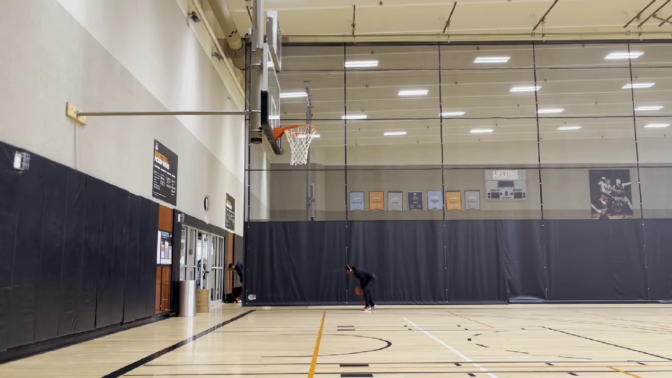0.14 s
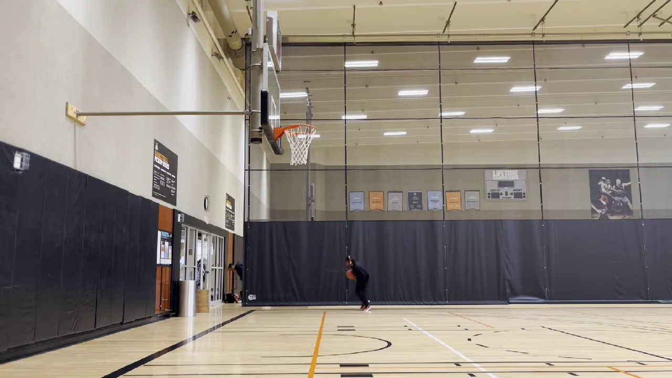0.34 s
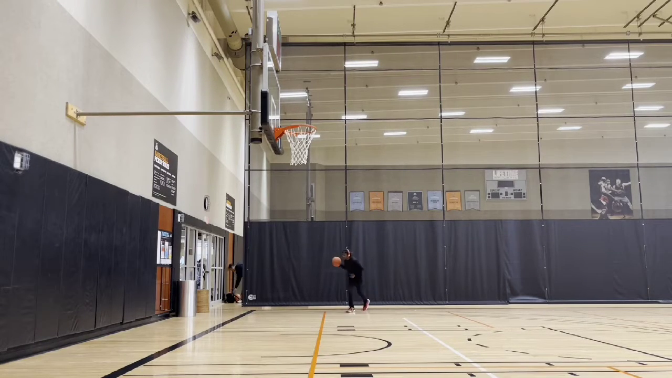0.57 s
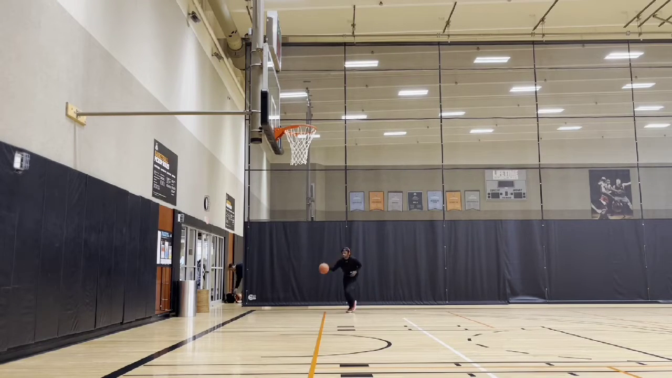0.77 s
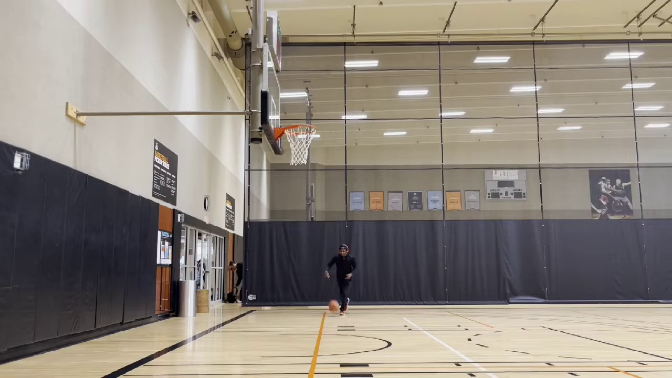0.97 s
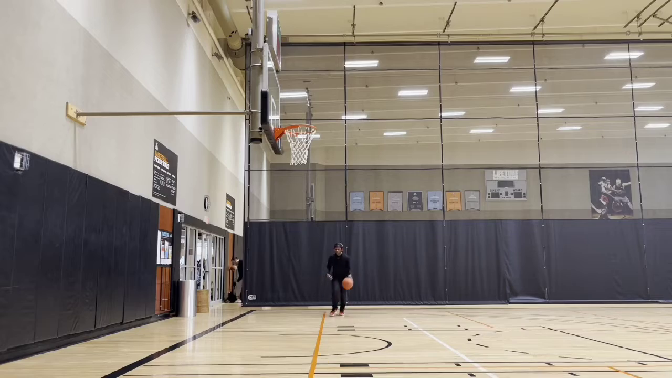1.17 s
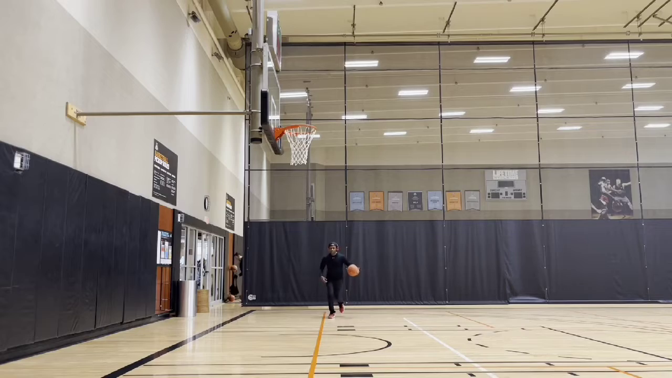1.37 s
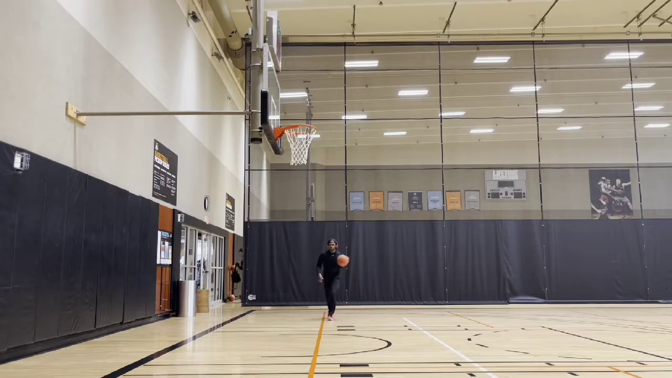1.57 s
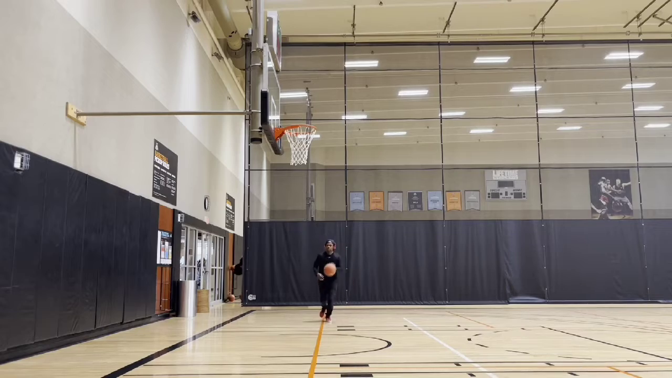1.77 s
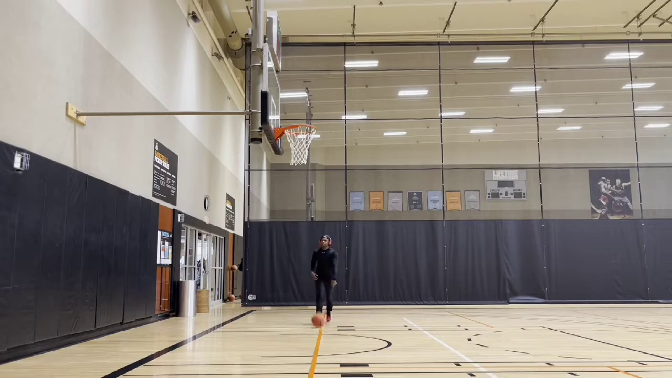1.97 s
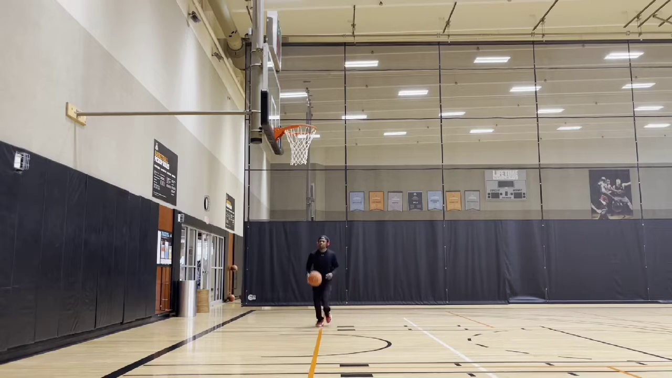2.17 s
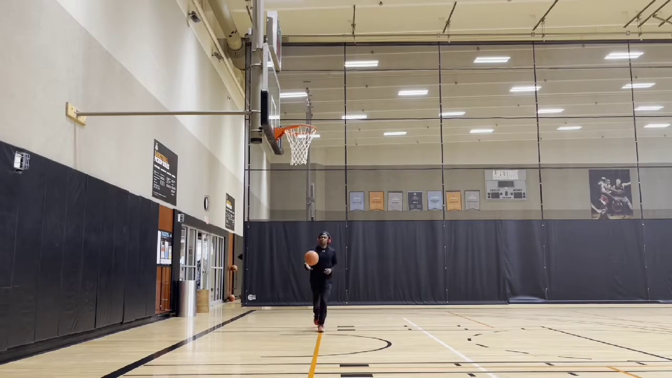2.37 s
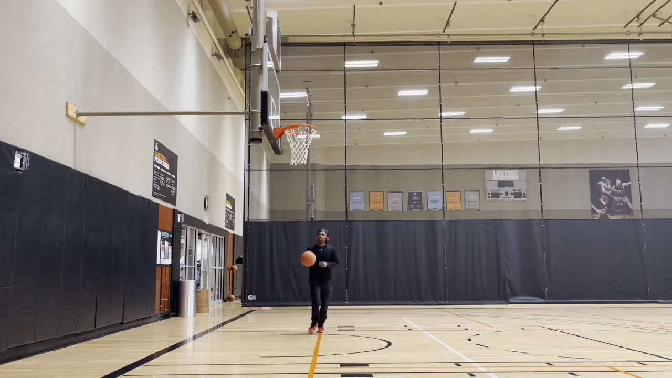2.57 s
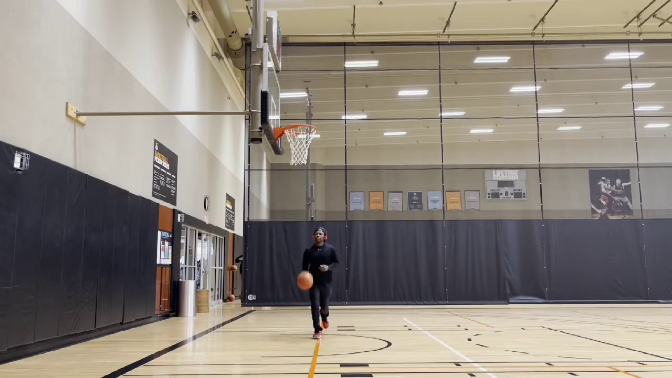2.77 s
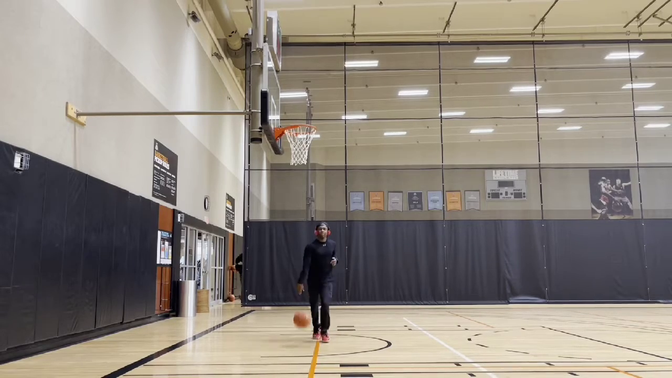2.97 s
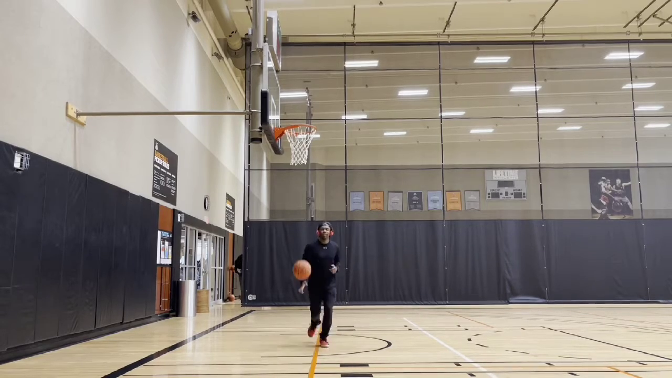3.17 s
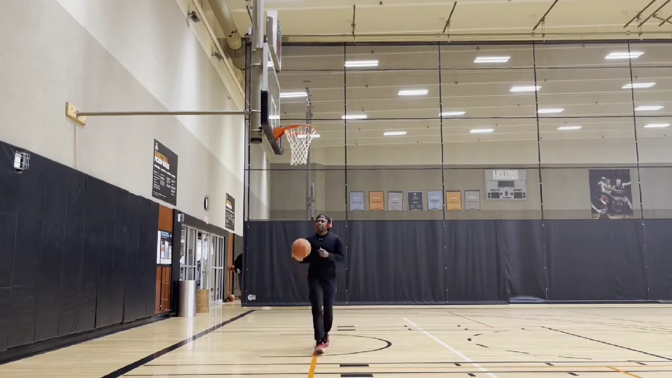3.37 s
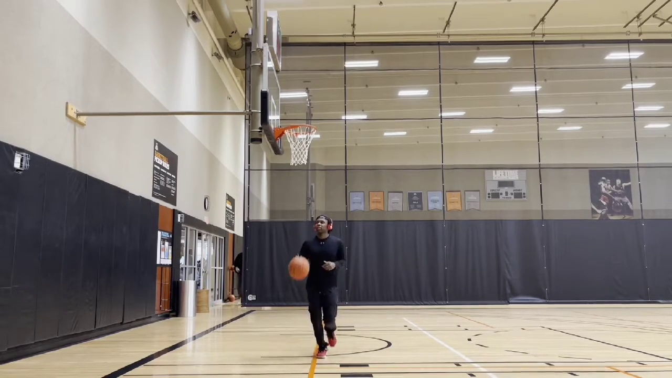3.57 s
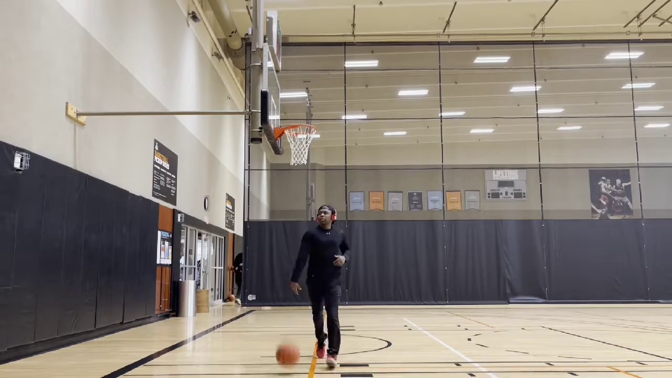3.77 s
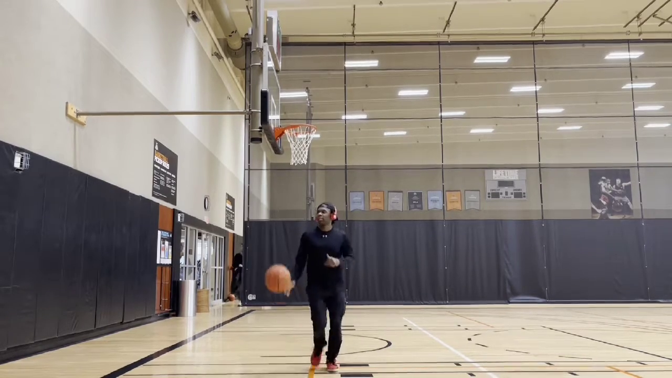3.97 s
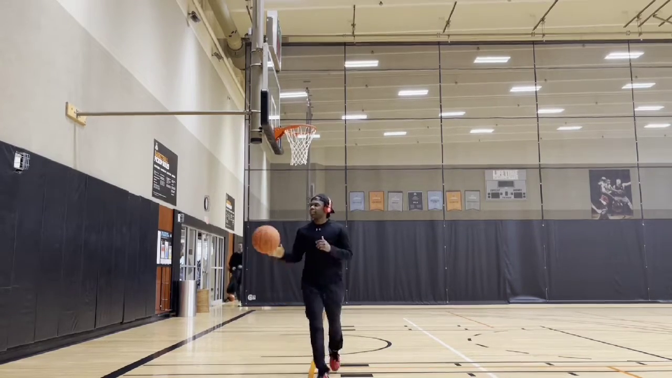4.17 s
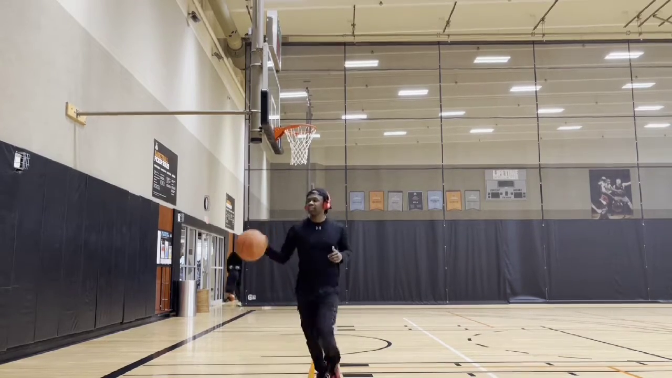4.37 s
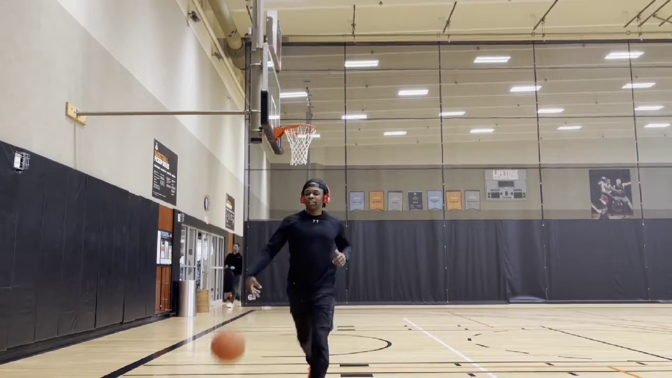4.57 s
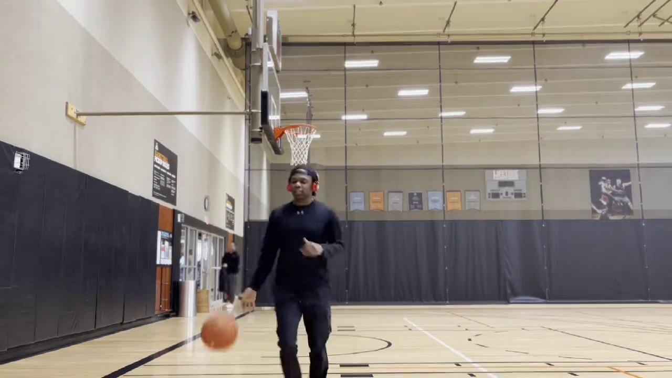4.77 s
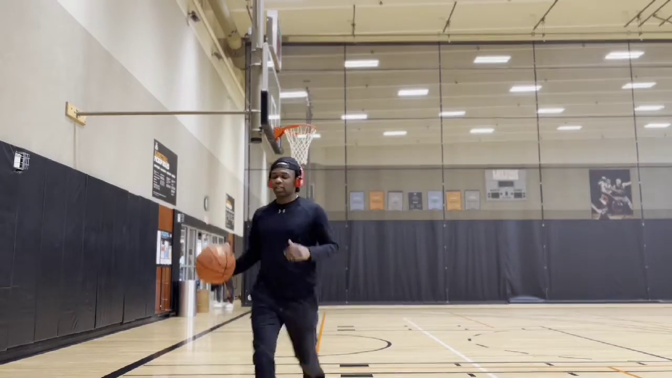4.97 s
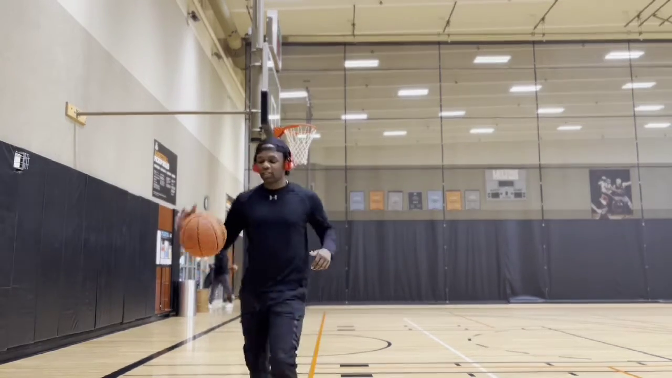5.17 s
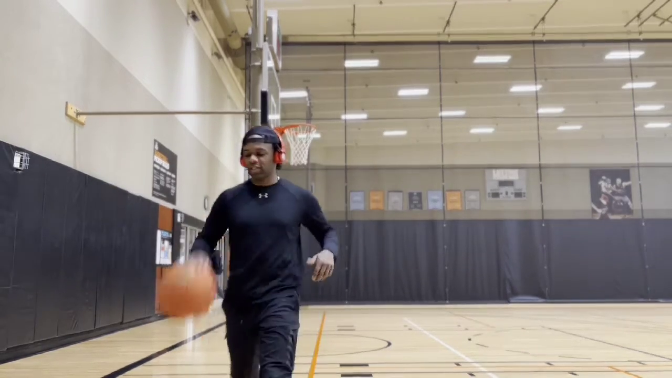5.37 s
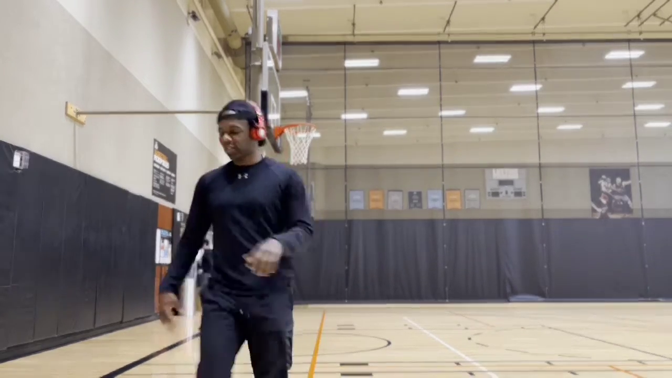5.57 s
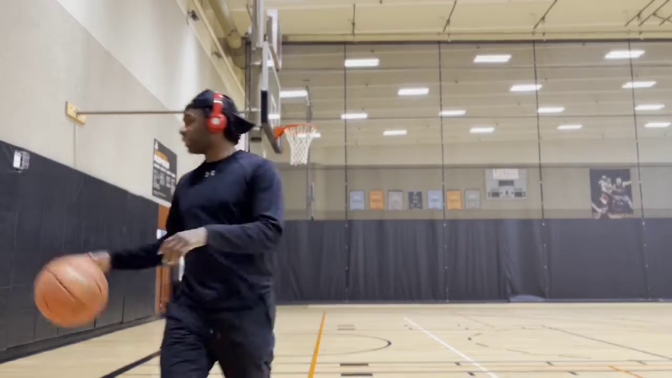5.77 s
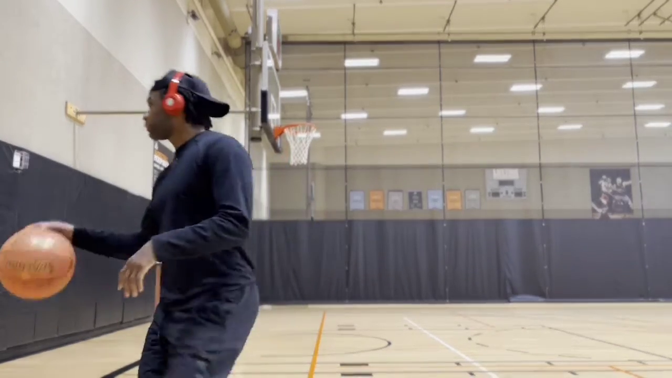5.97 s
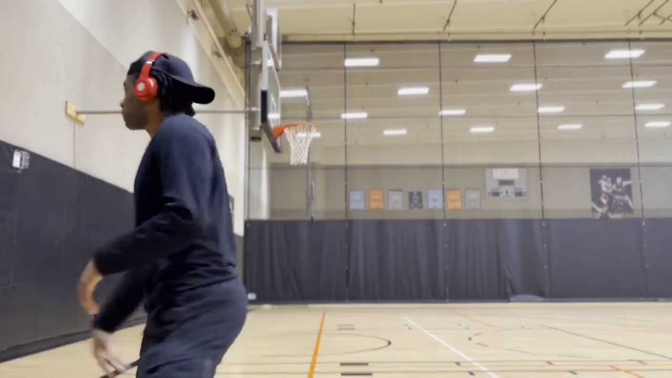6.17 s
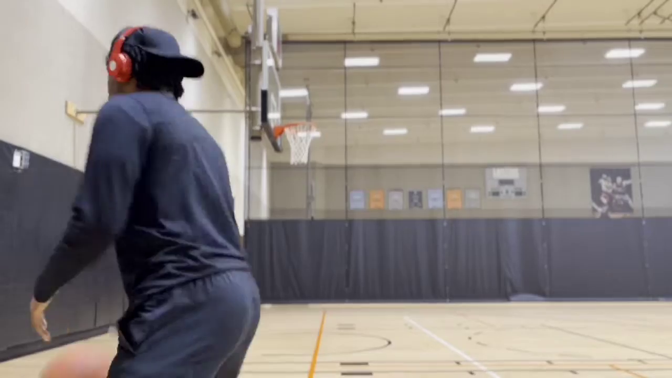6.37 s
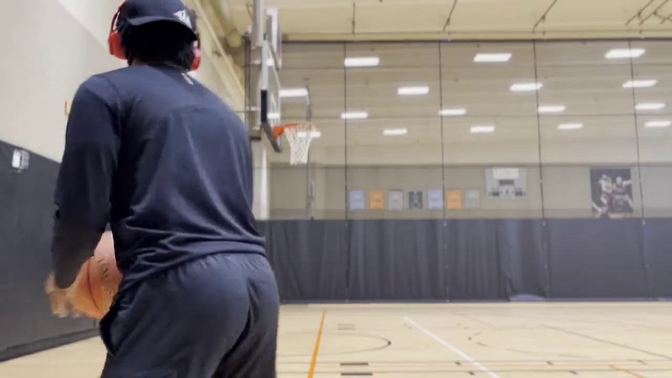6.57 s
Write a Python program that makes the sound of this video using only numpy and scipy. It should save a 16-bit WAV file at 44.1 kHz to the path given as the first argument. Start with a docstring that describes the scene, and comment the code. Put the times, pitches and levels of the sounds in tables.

```python
"""Basketball bounces ring through a large gym as a player dribbles toward the microphone.
Each bounce is a slap of the skin, a ping of the air in the ball and a falling boom of the sprung
hardwood floor; two walls echo it and the hall rings long after. Soles grip, trousers swish, and
the hand brushes the ball and once catches it with a sharp slap, over the rumble of the ventilation."""
import sys
import numpy as np
from scipy import signal
from scipy.fft import rfft, irfft, next_fast_len
from scipy.io import wavfile
from scipy.ndimage import uniform_filter1d

SR = 44100
rng = np.random.default_rng(int(sys.argv[2]) if len(sys.argv) > 2 else 0)


def int16_out(signal):
    """Quantize to a 16-bit WAV file."""
    q = np.round(np.clip(np.atleast_2d(signal).T, -1, 1) * 32767)
    wavfile.write(sys.argv[1], SR, q.astype(np.int16))


N = 292463

# Each bounce hits another spot of the floor:
# start_s, force_db, boom_db, settled_boom_hz, board_resonance_hz, board_peak_db, catch_rub_db
BOUNCE_EVENTS = [(1.1259, -0.14, -20.5, 126.5, 1430, 15, -82), (2.089, 2.5, -14.5, 141, 1460, 11, -91),
                 (3.0339, 4.5, -13, 119, 1176, 10, -77), (3.8649, 3, -11, 116.4, 1380, 8.5, -87),
                 (4.7474, 2.5, -11.5, 93.5, 1510, 5.5, -63), (5.6313, -0.8, -10.5, 101, 1320, 8.5, -66.5),
                 (6.3229, 0, -11.5, 97.6, 1670, 10.5, -83)]


def dribble(side_wall_m=8.2, side_wall_db=-26.5, back_wall_s=0.05, back_wall_db=-13.5):
    """Bounces, echoes and reverberation; as the player nears, the slap brightens, the side echo lags."""
    out, t, hz = np.zeros(N), np.arange(SR // 3) / SR, np.fft.rfftfreq(4096, 1 / SR)
    sound_m_per_s = 343
    for start_s, force_db, boom_db, boom_hz, board_hz, board_db, _ in BOUNCE_EVENTS:
        range_m = distance_m(start_s)
        tilt_db_per_octave = 3.5 - 0.24 * range_m
        colour_db = read(SLAP_SPECTRUM, hz) + tilt_db_per_octave * np.log2((hz + 200) / 1500)
        colour_db += board_db * bell(hz, board_hz, 0.16)
        smack = slap(t, colour_db) + ping(t)
        smack_db = force_db - 16 - 0.8 * np.log2(range_m)
        thud = boom(t, boom_hz)
        side_wall_s = (np.hypot(range_m, 2 * side_wall_m) - range_m) / sound_m_per_s
        bass_db = 3.5 - force_db  # the floor feeds the hall the same bass however hard the slap
        add(out, start_s, amp(boom_db) * thud + amp(smack_db) * smack)
        add(out, start_s + side_wall_s, amp(force_db + side_wall_db) * side_wall(t, smack, thud))
        add(out, start_s + back_wall_s, amp(boom_db + back_wall_db) * back_wall(t, thud))
        add(out, start_s, amp(force_db) * hall(boom_hz, board_hz, board_db, bass_db))
    return out


# Skin on the boards: frequency_hz, density_db
SLAP_SPECTRUM = [(100, -2.5), (300, 2.5), (520, 5), (660, -6.5), (800, -6), (1100, -5), (1600, -9.5),
                 (2000, -13.5), (3200, -15), (4800, -16.5), (6300, -29.5), (10000, -33), (15500, -46)]
# Skin snaps at first touch, as its ripple comes round, and at lift-off: delay_s, level_db, t60_s
SKIN_SNAPS = [(0, -2.5, 0.021), (.0062, -8, 0.02), (0.0104, -15, .012), (0.0151, -16, 0.055)]


def slap(t, colour_db, level_db=-2.5, rattle_db=-21, rattle_t60_s=0.085, spike_db=20.5):
    """The skin snaps as the ball flattens and lifts; the boards shiver on."""
    force = grit(len(t), grain_db=4) * amp(rattle_db - 60 * t / rattle_t60_s)
    for delay_s, snap_db, t60_s in SKIN_SNAPS:
        snap = rng.standard_normal(len(t)) * amp(-60 * t / t60_s)
        snap[0] = -amp(spike_db)
        add(force, delay_s * rng.uniform(0.93, 1.07), amp(snap_db) * snap)
    return amp(level_db) * signal.fftconvolve(force, causal(colour_db))[:len(t)]


# Air modes in the ball: pitch_hz, level_db, t60_s
BALL_MODES = [(910, -26, 0.099), (1625, -6.5, 0.027), (2280, -13, 0.014), (2600, -28, 0.078),
              (3380, -37, 0.018), (4000, -34.5, 0.16), (4600, -41, 0.097), (5340, -39, .1)]


def ping(t, level_db=-1, uneven_db=2):
    """The air in the ball rings; each blow excites its modes differently."""
    out = np.zeros(len(t))
    for pitch_hz, mode_db, t60_s in BALL_MODES:
        struck_db = level_db + mode_db + uneven_db * rng.standard_normal()
        out += amp(struck_db - 60 * t / t60_s) * np.sin(2 * np.pi * (pitch_hz * t + rng.random()))
    return out


# Short resonances of the boards: pitch_hz, level_db, peak_s, sharpness
BOARD_MODES = [(263, -0.5, 0.0067, 4.85), (515, -27, 0.0074, 0.51), (635, -21.5, 0.0095, 3.8)]


def boom(t, settled_hz, start_hz=176, sag_s=0.008):
    """Bending waves in the floor: high ones arrive first, so the pitch sags; the boards knock above."""
    sagging_hz = settled_hz + (start_hz - settled_hz) * np.exp(-t / sag_s)
    bending = swell(t, peak_s=0.015, sharpness=3.05) * np.sin(2 * np.pi * np.cumsum(sagging_hz) / SR)
    knock = sum(amp(level_db) * swell(t, peak_s, sharpness) * np.sin(2 * np.pi * pitch_hz * t)
                for pitch_hz, level_db, peak_s, sharpness in BOARD_MODES)
    return bending + knock


def side_wall(t, smack, thud, spread_s=0.0077, band_hz=(380, 1900)):
    """The wall along the player's path scatters the bounce, short of bass and treble."""
    echo = scatter(t, smack + amp(3) * thud, spread_s)
    return signal.lfilter(*signal.butter(1, band_hz, "band", fs=SR), echo)


def back_wall(t, thud, spread_s=0.0066, low_cut_hz=90):
    """The wall behind the microphone scatters the boom, without its deepest bass."""
    echo = scatter(t, thud, spread_s)
    return signal.lfilter(*signal.butter(1, low_cut_hz, "high", fs=SR), echo)


# Reverberation colour: frequency_hz, density_db
HALL_SPECTRUM = [(35, -12.5), (60, 3), (95, -0.5), (140, -2.5), (200, -9), (280, -11), (400, -22),
                 (560, -21), (800, -31), (1200, -31.5), (1650, -29.5), (1950, -38), (5200, -41),
                 (6500, -53.5)]
# Reverberation time: frequency_hz, t60_s
HALL_DECAY = [(60, 3.9), (130, 3.82), (300, 3.52), (700, 4.52), (1500, 4.12), (3000, 3.73), (5000, 1.53),
              (8000, 1.2), (15000, 0.29)]


def hall(boom_hz, board_hz, board_db, bass_db, level_db=-9, build_s=0.005, bass_build_s=0.02):
    """Diffuse sound builds, bass last, swells as the far walls answer, and decays band by band."""
    frames = dict(fs=SR, nperseg=2048, noverlap=1536)
    hz, frame_s, noise = signal.stft(grit(3 * SR, grain_db=0.86, grain_samples=120), **frames)
    bass = 1 / (1 + (hz / 200) ** 4)
    pitch_ratio = boom_hz / 115
    shifted_hz = hz / pitch_ratio ** (0.7 * bass)  # a deeper boom leaves a deeper rumble
    colour_db = read(HALL_SPECTRUM, shifted_hz) + bass_db * bass
    colour_db += 9 * np.log2(pitch_ratio) * bell(hz, 290, 0.51)  # a stiffer spot sends more knock
    colour_db += 0.73 * board_db * bell(hz, board_hz, 0.49)
    colour_db -= 6 * np.log2(np.maximum(hz / HALL_SPECTRUM[-1][0], 1))  # air absorption
    colour_db += sum(bell(hz, ping_hz, 0.019) for ping_hz, _, _ in BALL_MODES)
    uneven_db = unevenness_db(noise.shape) * (1 - bass[:, None])
    decay_db = -60 * frame_s / read(HALL_DECAY, hz)[:, None]
    late_bass = 1 - bass[:, None] * np.exp(-(frame_s / bass_build_s) ** 2)
    _, tail = signal.istft(noise * amp(colour_db[:, None] + uneven_db + decay_db) * late_bass, **frames)
    t = np.arange(len(tail)) / SR
    onset = 1 - np.exp(-(t / build_s) ** 2)
    far_walls_db = 2 * np.exp(-0.5 * ((t - 0.207) / 0.011) ** 2)
    return tail * onset * amp(level_db + far_walls_db)


def unevenness_db(shape, ripple_db=1.6, flutter_db=1.4):
    """Spectral ripple of one floor spot, and flutter as single echoes arrive."""
    ripple = smooth_noise(shape[0], 4)[:, None]
    patches = uniform_filter1d(rng.standard_normal(shape), size=24, axis=0)
    flutter = evened(uniform_filter1d(patches, size=3, axis=1))
    return ripple_db * ripple + flutter_db * flutter


# Player's path: time_s, distance_m
PLAYER_PATH = [(0, 13), (1.1, 15), (3, 9.3), (4.75, 3.6), (6.6, 1.27)]


def distance_m(time_s):
    """Range from microphone to player."""
    return np.interp(time_s, *np.transpose(PLAYER_PATH))


def player(wet_db=-6, t60_s=0.59, cutoff_hz=5000):
    """Shoes, hands and clothes, with a little of the hall."""
    direct = soles_and_catch() + pats() + rustle()
    tail = rng.standard_normal(SR) * amp(-60 * np.arange(SR) / SR / t60_s)
    tail = signal.lfilter(*signal.butter(2, cutoff_hz, fs=SR), tail / np.linalg.norm(tail))
    return direct + amp(wet_db) * signal.fftconvolve(direct, tail)[:N]


# Footfalls, and at 1.442 s a sharp slap of the hand catching the ball: start_s, swish_db, contact_db
CONTACTS = [(0.11, -57, -58), (0.375, -63, -44), (0.795, -58, -45), (1.055, -49, -43), (1.442, -65, -20.5),
            (1.722, -53, -57), (2.439, -51, -50), (2.778, -50, -42), (3.135, -49, -74), (3.479, -44.5, -37),
            (4.207, -50, -53), (4.5832, -52.5, -34.5), (4.929, -49, -35), (5.336, -50.5, -33.5),
            (5.74, -62, -46), (6.419, -65, -49)]


def soles_and_catch(sharp_s=0.0017, slide_s=0.016, turn_at_s=5.55):
    """Soles grip the varnish and once the hand slaps the ball, fainter and duller from afar."""
    out = np.zeros(N)
    for start_s, _, contact_db in CONTACTS:
        range_m = distance_m(start_s)
        peak_s = sharp_s if start_s < turn_at_s else slide_s  # soles slide once the player turns
        contact = scuff(peak_s, centre_hz=4600 - 110 * range_m, octaves=0.35)
        add(out, start_s, amp(contact_db) / range_m * contact)
    return out


# Pats as the ball is picked up: start_s, level_db, peak_s
PALM_PATS = [(0.521, -50.5, 0.0033), (0.698, -54.5, 0.011)]


def pats():
    """Palms knock dully on the ball."""
    out = np.zeros(N)
    for start_s, level_db, peak_s in PALM_PATS:
        add(out, start_s, amp(level_db) * scuff(peak_s, centre_hz=650, octaves=1.15))
    return out


def rustle(rise_s=0.0078, swish_s=0.08, push_lead_s=0.1, push_s=0.12, catch_lag_s=0.17, catch_s=0.16):
    """Trousers swish as the player moves; the ball's pebbles rub the palm at each pat, push and catch."""
    t, power = np.arange(N) / SR, np.zeros(N)
    swish = (1 - np.exp(-(t[:SR] / rise_s) ** 2)) * np.exp(-(t[:SR] / swish_s) ** 2)
    for start_s, swish_db, _ in CONTACTS:
        add(power, start_s, (amp(swish_db) / distance_m(start_s) * swish) ** 2)
    for start_s, pat_db, _ in PALM_PATS:
        add(power, start_s, (amp(pat_db - 32) * swish) ** 2)
    for bounce_s, *_, catch_db in BOUNCE_EVENTS:
        push_db = -74 - 4 * np.log2(distance_m(bounce_s))
        power += (amp(push_db) * np.exp(-((t - bounce_s + push_lead_s) / push_s) ** 2)) ** 2
        power += (amp(catch_db) * np.exp(-((t - bounce_s - catch_lag_s) / catch_s) ** 2)) ** 2
    grains = grit(next_fast_len(N), grain_db=2.5, grain_samples=110)
    friction = coloured(grains, lambda hz: bell(hz, centre_hz=8300, octaves=1))[:N]
    flicker_db = -0.5 + 1.7 * smooth_noise(N, 900)
    return amp(flicker_db) * np.sqrt(power) * friction


# Ventilation noise: frequency_hz, density_db
VENT_SPECTRUM = [(20, -38), (45, 0), (62, -3), (105, -5.5), (160, -18), (290, -27), (420, -33.5),
                 (700, -34), (1000, -40.5), (1650, -40.5), (1950, -53), (5200, -58.5), (6200, -68.5),
                 (16000, -76)]


def ventilation(level_db=-40.5):
    """Steady rumble and hiss of the air handling."""
    noise = rng.standard_normal(next_fast_len(N))
    return amp(level_db) * coloured(noise, lambda hz: amp(read(VENT_SPECTRUM, hz)))[:N]


def scuff(peak_s, centre_hz, octaves):
    """Gritty burst in one band; peak_s alone sets its energy."""
    envelope = swell(np.arange(SR // 2) / SR, peak_s, sharpness=0.87)
    grains = grit(len(envelope), grain_db=6.5)
    burst = envelope * coloured(grains, lambda hz: bell(hz, centre_hz, octaves))
    return burst * np.linalg.norm(envelope) / np.linalg.norm(burst)


def scatter(t, sound, spread_s):
    """Smears a sound over many small reflections."""
    taps = rng.standard_normal(len(t)) * swell(t, spread_s, sharpness=1)
    return signal.fftconvolve(sound, taps / np.linalg.norm(taps))


def grit(size, grain_db, grain_samples=60):
    """Noise whose strength jumps from grain to grain, rms 1."""
    return evened(rng.standard_normal(size) * amp(grain_db * smooth_noise(size, grain_samples)))


def smooth_noise(size, width):
    """Moving average of noise, rms 1."""
    return evened(uniform_filter1d(rng.standard_normal(size), size=width))


def coloured(x, gain):
    """Shapes the spectrum by gain(hz), rms 1."""
    return evened(irfft(rfft(x) * gain(np.fft.rfftfreq(len(x), 1 / SR)), len(x)))


def causal(spectrum_db):
    """Minimum-phase response of this spectral shape, energy 1."""
    log_gain = np.log(amp(np.concatenate([spectrum_db, spectrum_db[-2:0:-1]])))
    response = np.fft.ifft(np.exp(np.conj(signal.hilbert(log_gain)))).real
    return response / np.linalg.norm(response)


def swell(t, peak_s, sharpness):
    """Rises from 0 to 1 at peak_s, then decays."""
    return (t / peak_s * np.exp(1 - t / peak_s)) ** sharpness


def bell(hz, centre_hz, octaves):
    """Bump of height 1 in log frequency."""
    return np.exp(-0.5 * (np.log2((hz + 1) / centre_hz) / octaves) ** 2)


def read(table, hz):
    """Interpolates a table in log frequency."""
    table_hz, values = np.transpose(table)
    return np.interp(np.log(hz + 1), np.log(table_hz + 1), values)


def amp(db):
    """Decibels to gain."""
    return 10 ** (np.asarray(db) / 20)


def evened(x):
    """Scales to rms 1."""
    return x / np.sqrt(np.mean(x ** 2) + 1e-20)


def add(mix, start_s, sound):
    """Mixes a sound in at start_s."""
    part = mix[max(round(start_s * SR), 0):][:len(sound)]
    part += sound[:len(part)]


def scene():
    """The gym in mono."""
    return (dribble() + player() + ventilation())[None]


def record(dry, notch_hz=12700, notch_db=-15, low_cut_hz=30, band_limit_hz=16300):
    """Microphone: treble notch of its port, low cut, band limit."""
    hz = np.linspace(0, SR / 2, num=1025)
    port = causal(notch_db * bell(hz, notch_hz, octaves=0.091))
    low_cut = signal.butter(2, low_cut_hz, "high", fs=SR, output="sos")
    band_limit = signal.firwin(255, band_limit_hz, window=("kaiser", 9), fs=SR)
    heard = signal.oaconvolve(dry, port[None])[:, :N]
    heard = signal.sosfiltfilt(low_cut, heard, padtype="even")
    return signal.oaconvolve(heard, band_limit[None], "same")


dry = scene()
out = record(dry)
int16_out(out)
```